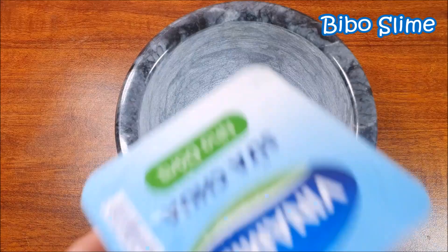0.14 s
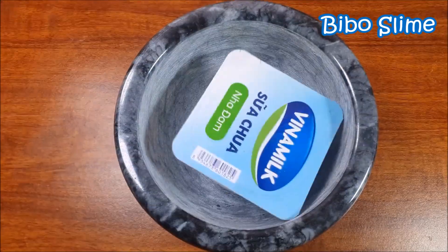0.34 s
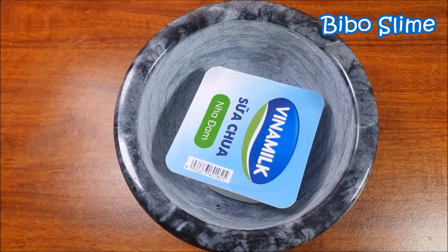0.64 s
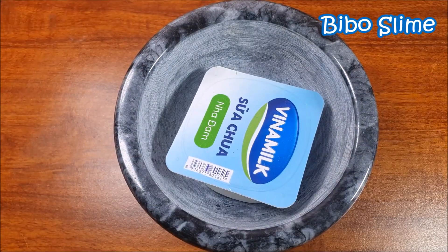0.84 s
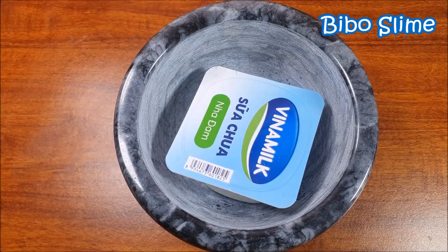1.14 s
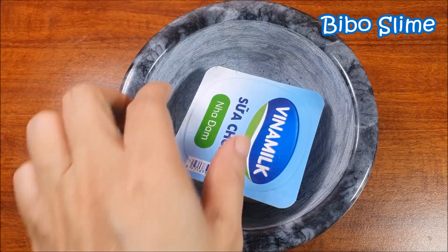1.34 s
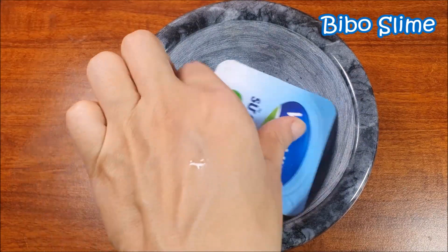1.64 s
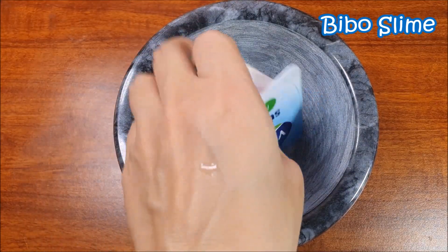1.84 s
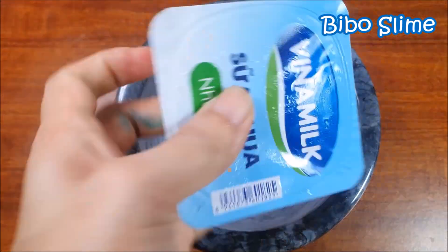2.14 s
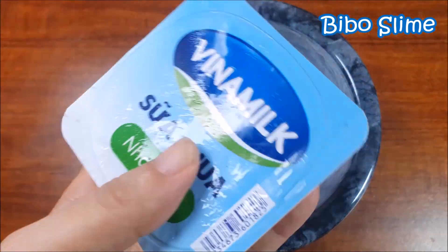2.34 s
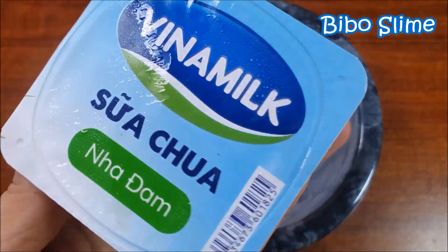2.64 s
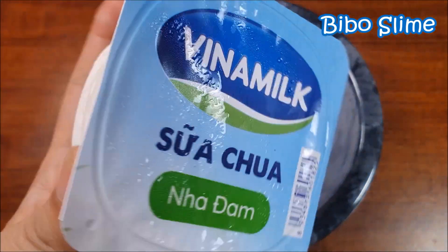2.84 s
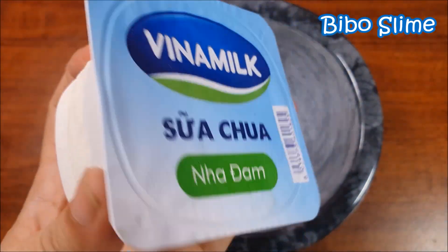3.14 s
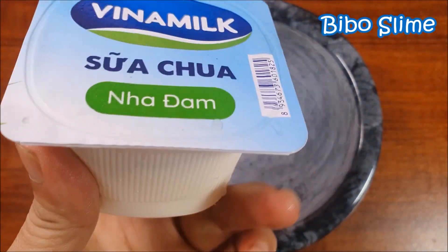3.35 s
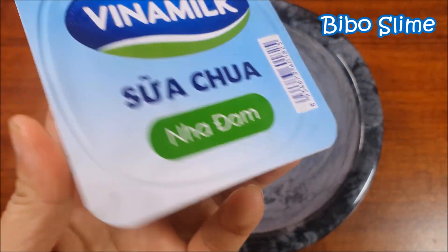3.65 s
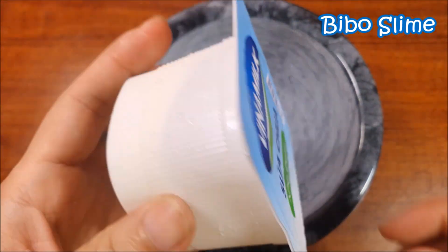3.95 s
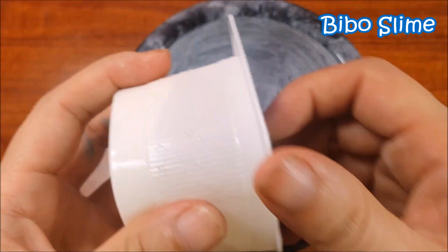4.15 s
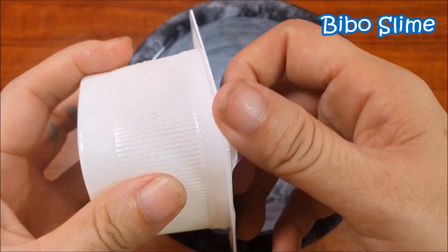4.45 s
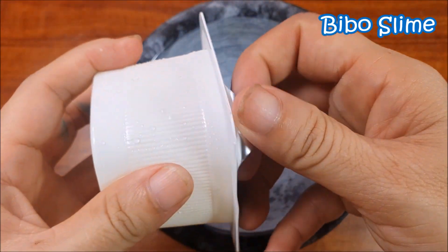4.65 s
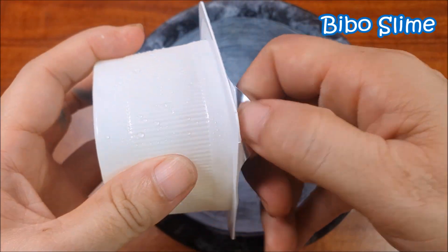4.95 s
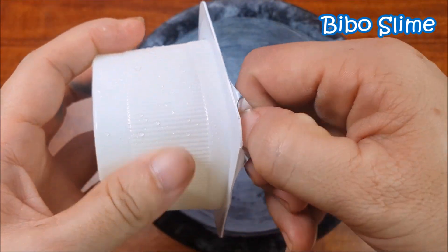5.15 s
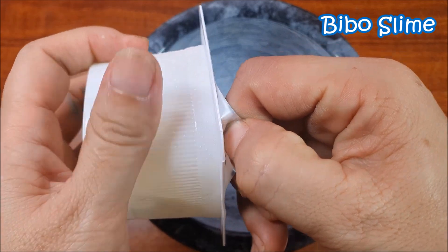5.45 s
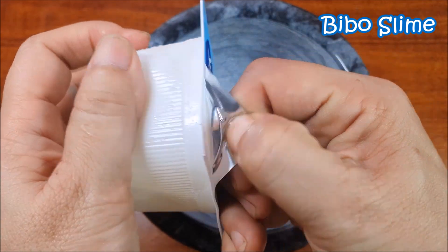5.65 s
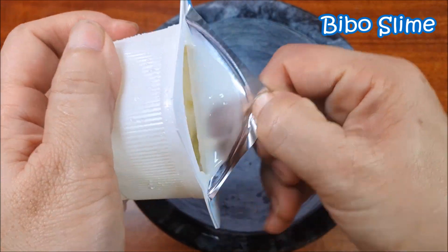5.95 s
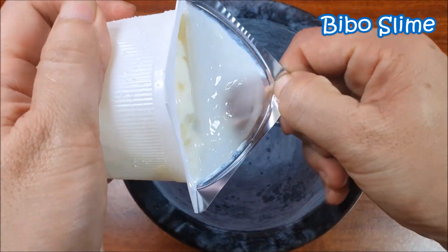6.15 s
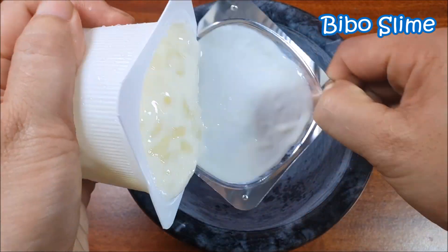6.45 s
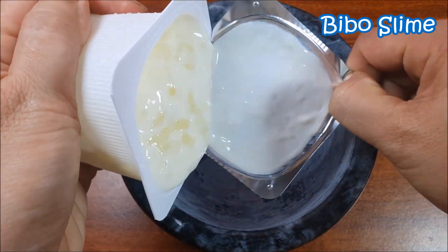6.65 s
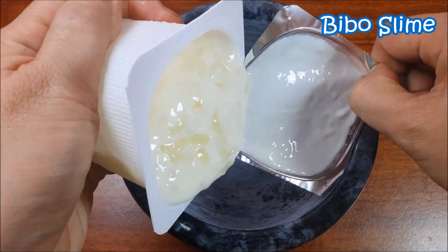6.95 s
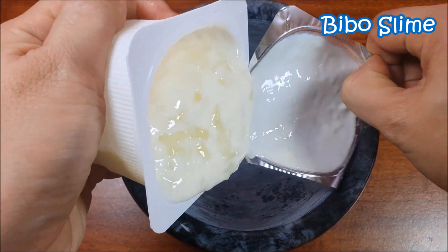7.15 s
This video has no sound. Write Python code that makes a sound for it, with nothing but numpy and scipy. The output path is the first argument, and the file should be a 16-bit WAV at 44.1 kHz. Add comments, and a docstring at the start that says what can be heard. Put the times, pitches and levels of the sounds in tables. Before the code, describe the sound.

Hard hollow knocks of a cup in a stone bowl, a second scraping clatter, quiet finger ticks, then jerky foil crackling and peeling.

```python
"""Plastic cup in a stone bowl

A full cup drops into a bowl on a wooden table, bounces, is dragged out by a hand and turned over.
Fingers pick at its foil lid, which then tears off in jerks and snaps. A quiet room rumbles.
Clicks and random slips ring the bowl, table, cup and foil; filtered noise makes grit, hiss and room.
The left microphone is nearer."""
import sys
import numpy as np
from scipy import signal
from scipy.fft import rfft, irfft, next_fast_len
from scipy.io import wavfile

SR = 44100
rng = np.random.default_rng(int(sys.argv[2]) if len(sys.argv) > 2 else 0)


def master(y):
    """Save y as 16-bit WAV."""
    cut = np.clip(np.atleast_2d(y).T, -1, 1)
    pcm = np.round(cut * 32767)  # scale
    wavfile.write(sys.argv[1], SR, pcm.astype(np.int16))


N = 322106
T = np.arange(N) / SR  # time in seconds


def undb(db):
    """Turn dB into a gain."""
    return 10 ** (np.asarray(db, float) / 20)


def unit(x):
    """Scale to rms 1."""
    return x / np.sqrt(np.mean(x ** 2))


def shape(x, points, lag_s=0.):
    """Colour a sound by (Hz, dB) points joined along log frequency, and delay it."""
    hz, db = np.transpose(points)
    size = next_fast_len(N, True)
    f = np.arange(size // 2 + 1) * SR / size
    gain = undb(np.interp(np.log(f + 1), np.log(hz + 1), db))
    delay = np.exp(-2j * np.pi * f * lag_s)
    return irfft(rfft(x, size) * gain * delay, size)[:N]


def wander(rate, size):
    """Random values 0-1 joined by straight lines, rate new ones a second."""
    knots = rng.random((size, 1000))
    return np.array([np.interp(T * rate, np.arange(1000), row) for row in knots])


def ring(x, modes):
    """Let x strike fading tones of alternating sign; a unit click gives a peak near 1."""
    t = T[:int(SR * max(t60 for _, _, t60 in modes))]
    response = np.zeros(len(t))
    for k, (hz, db, t60) in enumerate(modes):
        fade = np.exp(-np.log(1000) * t / t60)
        response += (-1) ** k * undb(db) * fade * np.sin(2 * np.pi * hz * t)
    return signal.oaconvolve(x, response / np.abs(response).max())[:N]


def blows(times, dbs, contact_s, chatter_db):
    """Each blow is one clean click plus random chatter that dies away over contact_s."""
    out, t = np.zeros(N + 512), T[:512]
    for s, db, chance in zip(times, dbs, rng.standard_normal((len(times), 512))):
        chatter = chance * np.exp(-t / contact_s)
        chatter = undb(chatter_db) * chatter / np.sqrt(np.sum(chatter ** 2))
        start = int(s * SR)
        out[start:start + 512] += undb(db) * (chatter + (t == 0))
    return out[:N]


def grains(rate, scatter_db):
    """Random slips, rate a second, of very unequal size and clumped in strength; rms 1."""
    hit, size, sign = rng.random((3, N))
    clumps = undb(5.0 * wander(70, size=1)[0])
    sizes = undb(-scatter_db * np.log(size + 1e-9))
    return unit(clumps * (hit < rate / SR) * sizes * np.sign(sign - .5))


def strokes(rows):
    """Each movement starts at once, swells and fades evenly in dB; powers add. One gain per level column."""
    swell_db, gone_db = 11.5, 90  # start this far under full level; stop near this far under it
    out = np.zeros((len(rows[0]) - 3, N))
    for s, swell_s, level_db, fade_s, *rest_db in rows:
        # a negative fade time makes this span empty, so such a row is silent
        span = slice(int(s * SR), int((s + swell_s + fade_s * gone_db / 60) * SR))
        late = T[span] - s - swell_s
        form_db = np.minimum(swell_db * late / swell_s, -60 * late / fade_s)
        levels_db = level_db + np.array([0.] + rest_db)
        out[:, span] += undb(2 * form_db) * undb(2 * levels_db)[:, None]  # doubled dB is power
    return np.sqrt(out)


def rub(force, slips, modes, bend):
    """Slips under a changing force ring three tunings in a drifting mix, as the object bends or tilts."""
    share = wander(16, size=3) ** 2 + .01
    share = np.sqrt(share / share.sum(axis=0))
    tunings = [[(hz * (1 + k * bend), db, t60) for hz, db, t60 in modes] for k in (-1, 0, 1)]
    rung = sum(ring(force * part * slips, tuning) for part, tuning in zip(share, tunings))
    return rung / np.std(ring(slips[:2 * SR], modes))


# Loudness of the room's low rumble. Each row: time in seconds, level in dB.
RUMBLE = [(0.0, -52.5), (0.318, -51.5), (1.198, -56), (1.724, -54.5), (2.2, -63), (2.4, -54), (3.12, -64),
          (3.46, -51), (3.61, -61), (3.82, -52.5), (4.68, -59), (4.77, -49.5), (5.79, -57), (6.27, -50),
          (7.3, -54.5)]
# Tone of the rumble. Each row: frequency in Hz, relative level in dB.
RUMBLE_TONE = [(15, -50.5), (25, -16), (58, -1), (91, -2), (115, 0), (126, -14.5), (129, -16), (150, -17),
               (180, -22), (230, -51), (400, -120)]
# Tone of the faint air and hiss. Each row: frequency in Hz, relative level in dB.
AIR_TONE = [(94, -42.5), (160, -0.5), (194, -0.5), (333, -10.5), (411, -20), (1060, -27.5), (1360, -32),
            (1710, -24.5), (1920, -32), (16000, -48)]


def background():
    """Bass noise nearly alike at both microphones, over faint, mostly unrelated air and hiss."""
    both, left, right, air_l, air_r = rng.standard_normal((5, N))
    level = undb(np.interp(T, *np.transpose(RUMBLE)))
    rumble = level * [unit(shape(both + .45 * own, RUMBLE_TONE)) for own in (left, right)]
    air = np.array([unit(shape(own + 0.51 * both, AIR_TONE)) for own in (air_l, air_r)])
    return rumble + undb(-66.5) * air


# The cup hits the bowl. Each row: time in seconds, edge tick peak in dB before mixing,
# hollow body in dB relative to the tick.
KNOCKS = [(0.2494, -74, 13), (0.3671, -23, 6.5), (0.3905, -16, 7), (0.3974, -19, 9.5), (0.402, -13.5, 2.5),
          (0.4104, -16.5, -1), (0.4164, -24, 6), (0.4394, -23.5, 1), (0.4963, -31, 16),
          (0.5132, -30.5, 10.5), (0.5676, -40.5, 20.5), (0.5844, -41.5, 18), (0.6074, -51, 10.5),
          (0.6444, -44.5, 18.5), (1.5944, -76, 27), (1.617, -76.5, 30), (1.7749, -42, 14),
          (1.7978, -25.5, 0), (1.8382, -20.5, 7.5), (1.8464, -18.5, 4), (1.8674, -15.5, 1.5),
          (1.8914, -23.5, 7), (2.0502, -40, -9), (2.1994, -53, 3), (2.2274, -53.5, 12),
          (2.2424, -45.5, -25), (2.3635, -61.5, 2), (2.5054, -65.5, 21.5), (2.5277, -59.5, 21),
          (2.6744, -78, 17)]
# The cup slides or rocks on the stone. Each row: start in seconds, swell in seconds, level in dB
# before mixing, time to fade 60 dB in seconds, grit in dB relative to that level.
SLIDES = [(.215, 0.01, -69, 0.5, -14), (.367, 0.0012, -20, 0.0641, -11.5), (.391, 0.011, -15, 0.17, -10.5),
          (.497, 0.021, -23.5, 0.12, -22), (.567, 0.016, -28.5, 0.13, -23.5),
          (.645, 0.0024, -47, 0.38, -23.5), (1.592, .028, -58, 0.36, -34), (1.65, 0.022, -60.5, -0.1, -35),
          (1.7, 0.032, -62.5, 1.66, -18), (1.773, 0.0019, -26.5, 0.3832, -18),
          (1.836, 0.019, -13, 0.2318, -15.5), (1.87, 0.043, -17, .2, -16), (1.93, .065, -17, 0.05, -16.5),
          (2.01, 0.04, -45.5, 0.1657, -4), (2.1, .02, -62, 0.6, -18), (2.364, 0.0078, -66, 0.36, -13),
          (2.2, 0.018, -51.5, 0.21, -13.5), (2.503, 0.027, -44, 0.07, -27.5), (2.673, .005, -69, 0.27, -30),
          (3.64, .066, -72, 0.25, -12), (3.8, 0.012, -67.5, 0.28, -14)]
# Tones of the bowl. Each row: frequency in Hz, relative level in dB, time to fade 60 dB in seconds.
BOWL = [(725, -13.5, .08), (803.5, -1.5, 0.05), (874.2, 1, 0.094), (959.4, -3.5, 0.12), (1037, 0.5, .11),
        (1096, -1, .09), (1196.5, -1, .07), (1261.6, -11.5, 0.14), (1335, -9, 0.098), (1498, -18.5, 0.1),
        (1810, -16, 0.13), (1950, -13.5, .035), (2290, -15, .035), (2536, -18.5, 0.013),
        (3060, -19.5, 0.027), (3170, -17.5, 0.022), (3460, -18.5, 0.034), (3700, -23.5, 0.034)]
# Tone of ticks and grit. Each row: frequency in Hz, relative level in dB per Hz.
GRIT = [(880, -27), (1500, -8), (2250, -1.5), (3730, -12), (4240, -12), (16000, -35.5)]


def cup_on_bowl():
    """Hits and sliding ring the bowl; hard edges tick and grit rasps. Also returns the forces."""
    s, tick_db, body_db = np.transpose(KNOCKS)
    slide, grit = strokes(SLIDES)
    slips = grains(5000, 2.0)
    hits = blows(s, tick_db + body_db, 0.00075, -8.5)
    rung = undb(1.5) * ring(hits, BOWL)
    rung += undb(-5) * rub(slide, slips, BOWL, 0.014)
    ticks = undb(27.5) * shape(blows(s, tick_db, 0.0027, -5), GRIT)
    rasp = undb(4.5) * grit * unit(shape(slips, GRIT))
    return rung + ticks + rasp, hits, slide, slips


# Tones of the table top. Each row: frequency in Hz, relative level in dB,
# time to fade 60 dB in seconds.
TABLE = [(180, -6, .1), (240, -1, 0.092), (290, -1.5, 0.12), (340.9, -5.5, 0.096), (416, -5, 0.11),
         (488.8, 0, 0.095), (624, 1, 0.059)]


def table_top(hits, slide, slips):
    """The same hits and slips in the bowl ring the wood below it."""
    return undb(-23) * ring(hits, TABLE) + undb(-29.0) * rub(slide, slips, TABLE, .04)


# The table legs are set shaking. Each row: start in seconds, swell in seconds,
# level in dB before mixing, time to fade 60 dB in seconds.
SHAKES = [(.368, .03, -30, 1.08), (.42, .11, -30, 0.88), (1.775, .005, -43, 1), (1.845, .055, -31.5, 0.53)]
# Tones of the legs. Each row: frequency in Hz, relative level in dB, time to fade 60 dB in seconds.
LEGS = [(47, 3, 0.13), (69, -3, 0.28), (106, 1, 0.14), (144.6, -19.5, 0.75)]


def table_legs():
    """Noise rings low tones: the table heaves, alike at both microphones, and rocks, opposite at them."""
    heave, rock = (rub(strokes(SHAKES)[0], push, LEGS, 0.033) for push in rng.standard_normal((2, N)))
    return undb(-1.0) * heave + undb(-12) * rock * np.array([[1], [-1]])


# Fingers rub the lid, then the seal peels in pulls. Each row: start in seconds, swell in seconds,
# cup wall in dB before mixing, time to fade 60 dB in seconds, foil crinkle in dB relative to the wall,
# glue hiss in dB relative to the wall.
PULLS = [(4.227, 0.0018, -56, 0.25, -25, -30), (4.355, .015, -70.5, 2.9, -15.5, -23),
         (4.47, 0.069, -67.5, 0.4, 0.5, -15), (4.62, 0.045, -74, .25, 6.5, -9),
         (4.735, 0.021, -54, 0.28, -11, -15), (4.92, .002, -62, 0.15, -4, 0),
         (4.94, 0.011, -72.5, 0.85, 0.5, -13), (5.04, .035, -79, 0.53, 9.5, 4),
         (5.18, 0.034, -82, 1.3, -1, -5), (5.723, 0.0013, -63.5, 0.12, -3, 10),
         (5.74, 0.063, -46, 0.58, -3.5, -12.5), (5.815, .045, -50, -0.62, -6, -10),
         (5.9, 0.063, -59, 0.3, -12, -15), (5.936, 0.002, -48.5, 0.1, 0, -18),
         (5.96, 0.085, -53, .5, -1.5, -11.5), (6.05, 0.067, -51, 0.52, -3.5, -8),
         (6.333, .003, -69, 0.7, -5, -10), (6.458, 0.00089, -48, 0.37, 3.5, 1.5),
         (6.495, 0.029, -34.5, 0.17, -4.5, -8), (6.717, 0.0019, -55.5, 0.18, 4.5, -5),
         (6.757, 0.0041, -52.5, 0.2, 2.5, -3), (6.79, .04, -60, 0.28, -8.5, -12.5),
         (6.95, .09, -69.5, 6, -11, -25), (7.063, 0.041, -45, 0.65, -5.5, -13),
         (7.125, 0.012, -43, .5, -7.5, -16.5), (7.15, 0.043, -43, 0.24, -13, -28),
         (7.25, 0.039, -50.5, -6, -6, -13)]
# Tones of the cup wall. Each row: frequency in Hz, relative level in dB,
# time to fade 60 dB in seconds.
CUP = [(430, -7, 0.013), (630, -21, 0.017), (880, 8.5, 0.032), (1035, 7.5, 0.051), (1386, 15.5, 0.007),
       (1540, -22, .025), (1724, 5.5, 0.023), (2000, -19, 0.011), (2440, -5.5, 0.0058)]
# Tones of the foil. Each row: frequency in Hz, relative level in dB, time to fade 60 dB in seconds.
FOIL = [(3170, 0, 0.0067), (3270, 20.5, 0.0039), (3316, 5.5, 0.075), (3874, 9.5, 0.0071),
        (4984, 15.5, 0.0063), (5135, 12, 0.016), (6160, 12.5, 0.0055), (8960, -10.5, 0.011),
        (12800, -14, 0.0035), (14700, -19, .003)]
# Tone of the glue hiss. Each row: frequency in Hz, relative level in dB.
HISS = [(4120, -58), (7000, 2.5), (10400, 6.5), (12100, 1), (14000, 3), (16000, -6)]


def lid_peel():
    """Glue slips shake the cup wall and crinkle the foil; finer slips hiss."""
    wall, crinkle, hiss = strokes(PULLS)
    slips = grains(7000, 1.8)
    peel = undb(-5.0) * rub(wall, slips, CUP, 0.1)
    peel += undb(-2.5) * rub(crinkle, slips, FOIL, 0.034)
    peel += undb(-1.5) * hiss * unit(shape(grains(12000, 1.8), HISS))
    return peel + undb(-12.5) * rub(wall, slips, BOWL, 0.029)  # the hollow bowl below rings along


# The seal lets go at one spot. Each row: time in seconds, peak in dB before mixing,
# foil crack in dB relative to the peak.
SNAPS = [(4.228, -39, -18), (4.368, -55, -17), (4.755, -54.5, 9.5), (4.905, -62, 4.5), (4.92, -53, 10.5),
         (5.21, -69.5, 17.5), (5.228, -67, 17), (5.727, -52, 6), (5.78, -38.5, -16), (5.807, -27, -9),
         (5.904, -56, -15), (5.936, -29.5, 3.5), (5.956, -36.5, -4), (6.333, -41, 1.5), (6.458, -29, 4.5),
         (6.476, -30, 1), (6.512, -23, 0), (6.524, -19.5, -1), (6.533, -52, -15), (6.545, -45, -10),
         (6.717, -44, 13), (6.757, -43.5, 15.5), (6.784, -39, 6.5), (6.826, -41.5, -2.5), (7.083, -33, -3),
         (7.131, -30, -3.5), (7.196, -30, -7)]


def lid_snaps():
    """Big slips click against the cup wall, crack the foil and hiss."""
    s, db, crack_db = np.transpose(SNAPS)
    cracks = blows(s, db + crack_db, 0.0031, 2.6)
    wall = undb(-2.5) * ring(blows(s, db, 0.0018, -3.5), CUP)
    return wall + undb(-2.5) * ring(cracks, FOIL) + undb(1.0) * shape(cracks, HISS)


# Tone lean of near sounds to the left. Each row: frequency in Hz,
# cut in dB on the right before its overall gain.
LEAN = [(120, -1), (250, 4.5), (500, 12.5), (1000, 14.5), (2000, 1), (4000, 16), (8000, 12.5), (13000, 12)]


def arrive(x):
    """Left hears the direct sound; right hears it shaded, later, its treble scattered over shifting paths."""
    scatter_hz, scatter_s, shifts_per_s = 2000, 0.0045, 52  # only sound above scatter_hz is scattered
    low = signal.filtfilt(*signal.butter(2, scatter_hz, fs=SR), x)
    t = T[:1024]
    early = rfft(rng.standard_normal((2, 1024)) * np.exp(-t / scatter_s) + 3.0 * (t == 0))
    colourless = irfft(early / np.abs(early))  # scatters in time only
    paths = signal.fftconvolve((x - low)[None], colourless, axes=1)[:, :N]
    turn = 2 * np.pi * wander(shifts_per_s, size=1)[0]
    right = low + np.cos(turn) * paths[0] + np.sin(turn) * paths[1]
    shaded = shape(right, [(hz, -db) for hz, db in LEAN], lag_s=0.00013)
    return np.array([undb(5.5) * x, undb(6.0) * shaded])


def room(x):
    """A dull, decaying cloud of reflections, another one at each microphone."""
    fade_60db_s, damp_hz = .3, 4840
    t = T[:SR // 2]
    cloud = rng.standard_normal((2, len(t))) * np.exp(-np.log(1000) * t / fade_60db_s)
    cloud *= t > .003  # reflections come after a short gap
    cloud = signal.lfilter(*signal.butter(1, damp_hz, fs=SR), cloud)
    cloud /= np.sqrt(np.sum(cloud[0] ** 2))
    return signal.fftconvolve(x[None], cloud, axes=1)[:, :N]


def scene():
    """Near sounds lean to the left microphone; the room and table reach both about alike."""
    knock, hits, slide, slips = cup_on_bowl()
    top = table_top(hits, slide, slips)
    legs = table_legs()
    near = knock + lid_peel() + lid_snaps()
    # the wide table top fills the room more than the cup
    echoes = undb(-22) * room(near) + undb(-2.5) * room(top)
    top_pair = undb([[2.5], [-2.5]]) * top
    return arrive(near) + echoes + top_pair + legs + background()


def record(dry):
    """The recorder cuts the deep bass, clips at full scale and cuts the top."""
    low_cut_hz, top_hz = 43, 15900
    cut = signal.sosfilt(signal.butter(7, low_cut_hz, "high", fs=SR, output="sos"), dry)
    clipped = np.clip(cut, -1, 1)
    return signal.sosfilt(signal.ellip(12, .2, 90, top_hz, fs=SR, output="sos"), clipped)


dry = scene()
out = record(dry)
master(out)
```